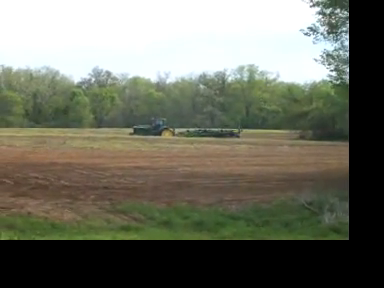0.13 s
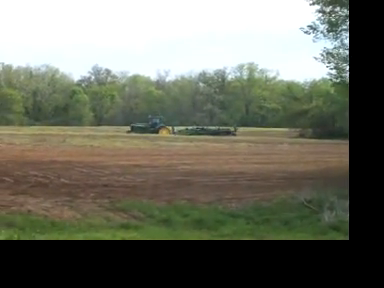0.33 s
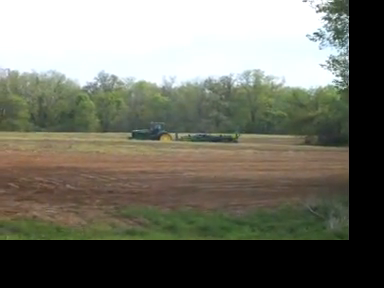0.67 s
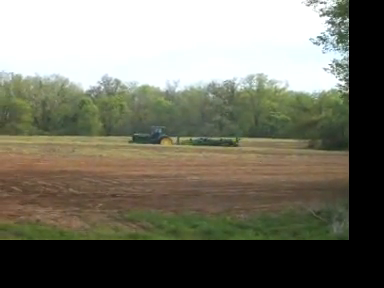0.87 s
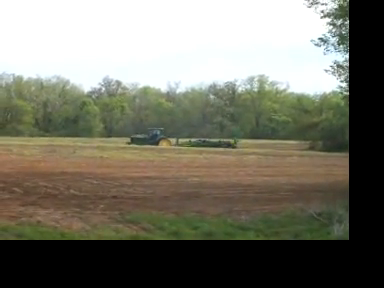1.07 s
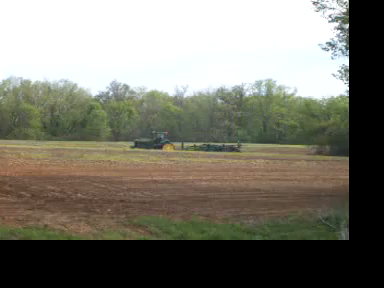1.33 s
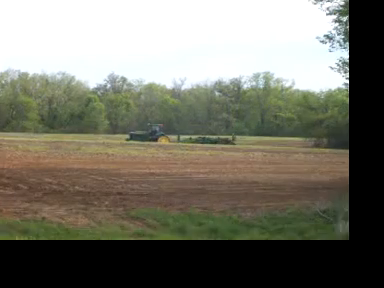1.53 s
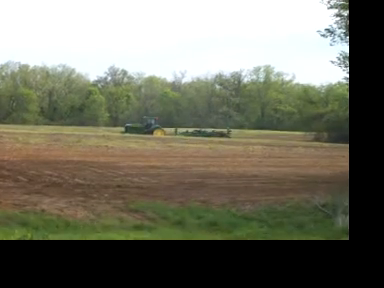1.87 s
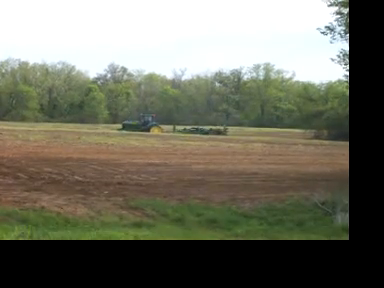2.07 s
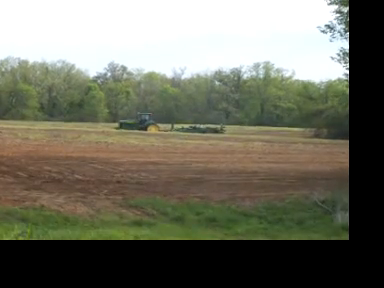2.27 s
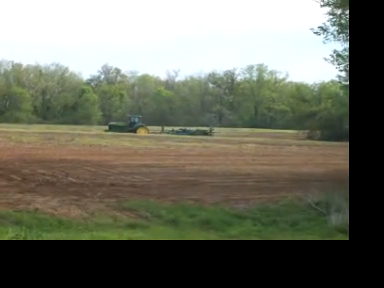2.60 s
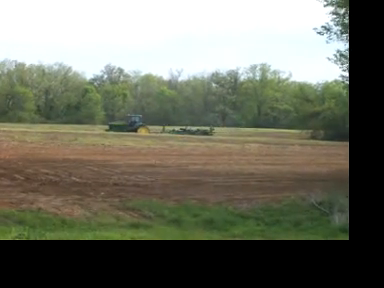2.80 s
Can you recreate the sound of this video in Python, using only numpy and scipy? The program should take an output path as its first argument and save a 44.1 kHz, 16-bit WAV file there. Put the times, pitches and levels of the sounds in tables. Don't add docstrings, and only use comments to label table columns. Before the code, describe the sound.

Continuous far-off tractor engine hum and grainy mechanical rattle over an open field, a tiny chain clink at the start, one click midway, a dull knock near the end, low wind, dull treble.

```python
import sys
import numpy as np
from scipy import signal
from scipy.io import wavfile
from scipy.ndimage import uniform_filter1d

SR = 44100
rng = np.random.default_rng(int(sys.argv[2]) if len(sys.argv) > 2 else 0)


def store_wav(level_fs):
    pcm = np.round(np.clip(np.atleast_2d(level_fs), -1, 1) * 32767)
    wavfile.write(sys.argv[1], SR, pcm.T.astype(np.int16))


def how_loud(loudness_db):
    steps = np.asarray(loudness_db, float) / 20
    return 10 ** steps


N = 129213
T = np.arange(N) / SR


def ring(x, hz, width_hz):
    b, a = signal.iirpeak(hz, hz / (1.213 * width_hz), fs=SR)
    once = signal.lfilter(b, a, x)
    twice = signal.lfilter(b, a, once)
    return twice / np.std(twice)


def walk(rate_hz):
    hold = int(SR / rate_hz)
    held = np.repeat(rng.standard_normal(N // hold + 1), hold)
    slewed = uniform_filter1d(uniform_filter1d(held, hold), hold)
    return 1.03 * slewed[:N]


def tone(cycles, level_db, flutter_db, rate_hz, wander_rad):
    level = np.sqrt(2) * how_loud(level_db + flutter_db * walk(rate_hz))
    return -level * np.sin(2 * np.pi * cycles + wander_rad * walk(rate_hz))


def rumble():
    # centre_hz, width_hz, level_db (rms), flutter_db
    bands = [(11, 37, -57, 6.5), (30, 72, -40.5, 4.5), (55, 17, -46.5, -3.5), (95, 24, -42.5, 1.8),
             (125.7, 45, -42.5, -4.9), (180, 40, -41.5, -0.3), (232.5, 49, -45.5, 4.9)]
    out = np.zeros(N)
    for hz, width_hz, level_db, flutter_db in bands:
        flutter = np.minimum(flutter_db, 100 / hz) * walk(12)
        out += how_loud(level_db + flutter) * ring(rng.standard_normal(N), hz, width_hz)
    return out


def machinery(firings):
    fan_db = [-41, -48, -48]
    shaft_db = [-43.5, -51.5, -48, -45.5]
    fan_ratio, shaft_ratio = 3.23, .206
    out = tone(1469 * T, -56.5, 1.5, 7.1, .3)
    for k, level_db in enumerate(fan_db, 1):
        out += tone(firings * fan_ratio * k, level_db, 1.6, 8, .3 * k)
    for k, level_db in enumerate(shaft_db, 1):
        out += tone(firings * shaft_ratio * k, level_db, 3.4, 2, .27)
    return out


def clinks():
    # time_s, pitch_hz, level_db, length_s
    hits = [
        (.07, 3370, -44, .012),
        (.1, 3220, -35, .022),
        (.105, 3800, -46, .015),
        (2.609, 900, -23, .004),
    ]
    out = np.zeros(N)
    for time_s, hz, level_db, length_s in hits:
        swell = np.exp(-((T - time_s) / length_s * 2) ** 2)
        out += how_loud(level_db) * swell * np.sin(2 * np.pi * hz * T)
    return out


def buzz(firings):
    # time_s, swell_db, length_s
    swells = [
        (.83, 8, 0.1),
        (1.2, 13, .2),
        (2.45, 10, 0.22),
    ]
    swell_db = sum(db * np.exp(-((T - time_s) / length_s) ** 2) for time_s, db, length_s in swells)
    return tone(firings * 12, -38.5 + swell_db - 5, 1.5, 10, .35)


def clatter(firings):
    # centre_hz, width_hz, level_db (rms)
    panels = [(368, 93, -51), (466.5, 78, -50), (592.7, 65, -41), (651, 28, -50), (705.3, 59, -38),
              (823, 80, -41), (865, 25, -43), (884.4, 31, -42.5), (957.7, 56, -40.5), (1003.7, 25, -43),
              (1078, 36, -42.5), (1137.4, 80, -45.5), (1218, 110, -50), (1392, 220, -50.5)]
    # centre_hz, width_hz, level_db (rms)
    rattle = [(1801, 300, -51), (2152, 250, -44), (2374, 220, -42.5), (2562, 110, -39.5),
              (2660, 250, -39.5), (2934, 250, -45.5), (3240, 360, -45.5), (3692, 320, -45),
              (4235, 230, -64)]
    knock = rng.standard_normal(N) * how_loud(.6 * walk(29.9))
    turning_db = -6.5 * np.exp(-T / 1)
    out = np.zeros(N)
    for k, (hz, width_hz, level_db) in enumerate(list(panels) + list(rattle)):
        opening_db = turning_db * np.clip(hz / 2000 - .5, 0, 1)
        flicker_db = .4 * walk(9) + .31 * walk(20)
        shimmer_db = 4.5 * (hz > 3900) * walk(50)
        level = how_loud(level_db + opening_db + flicker_db + shimmer_db)
        out += (-1) ** k * level * ring(knock, hz, width_hz)
    gate_db = 1.2 * np.cos(2 * np.pi * (firings - .9))
    return out * how_loud(gate_db)


def stack(firings):
    partials = np.array([(3, -47), (5, -55), (6, -24.5), (7, -55), (9, -41), (11, -45.5), (12, -27),
                (13, -39.5), (14, -47), (15, -48), (16, -49), (17, -48), (18, -45), (30, -55), (78, -47),
                (84, -48)])
    out = np.zeros(N)
    for order, level_db in partials:
        out += tone(firings * round(order) / 6, level_db, .05 * order, 8.3, .005 * order)
    return how_loud(.37) * out


def scene():
    # time_s, firing_rate_hz, stack_db, clatter_db
    engine_course = [(0, 72.22, 0, 0), (.1, 72.72, -0.5, 1), (.35, 73.33, 0, 1), (.47, 73.04, 0, 0.5),
                     (.55, 70.37, -2, 0), (0.849, 71.58, -1, 1), (1.0, 73.96, 1, 1), (1.15, 73.6, 0, 1.5),
                     (1.3, 73.9, 0.5, 0.5), (1.449, 74.23, 1, 1.5), (1.651, 75.07, 0, 0.5),
                     (1.752, 73.86, 0.5, 1), (1.95, 74.24, 0, 0), (2.151, 73.4, 0, 1),
                     (2.25, 73.04, 1, -0.5), (2.451, 74.25, 0, 0), (2.65, 72.69, -1, -0.5),
                     (2.93, 74.47, 0, 0)]
    time_s, firing_hz, stack_db, clatter_db = np.array(engine_course).T
    firings = np.cumsum(np.interp(T, time_s, firing_hz)) / SR
    firings = firings - np.interp(1.3864, T, firings)
    exhaust = how_loud(np.interp(T, time_s, stack_db)) * stack(firings)
    knocking = how_loud(np.interp(T, time_s, clatter_db)) * clatter(firings)
    mix = exhaust + knocking + buzz(firings) + machinery(firings) + rumble() + clinks()
    return mix[None]


def jump_back(x):
    jump_s, back_s, jump, settle_s = 1.38703, .0034, .2, .003
    i, j = np.arange(N), int(jump_s * SR)
    x = x[:, i - int(back_s * SR) * (i >= j)]
    settle = (i >= j) * np.exp(-np.maximum(i - j, 0) / SR / settle_s)
    return x + (jump - (x[0, j] - x[0, j - 1])) * settle


def low_pass(x):
    return signal.sosfilt(signal.butter(12, 16400, fs=SR, output="sos"), x)


def record(dry):
    ceiling, top_hz, band_edge_hz = .62, 4453, 15900
    rounded = ceiling * np.tanh(dry / ceiling)
    narrow = signal.sosfilt(signal.ellip(10, .3, 75, top_hz, fs=SR, output="sos"), rounded)
    edge = signal.ellip(12, .1, 60, band_edge_hz, fs=SR, output="sos")
    return low_pass(signal.sosfiltfilt(edge, jump_back(narrow)))


dry = scene()
out = record(dry)
store_wav(out)
```